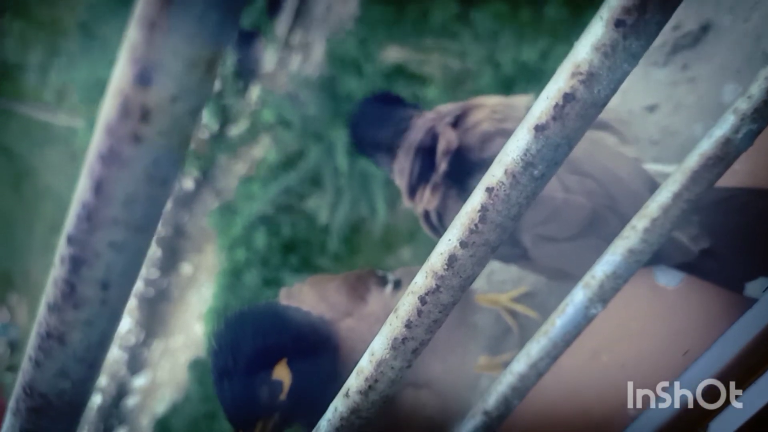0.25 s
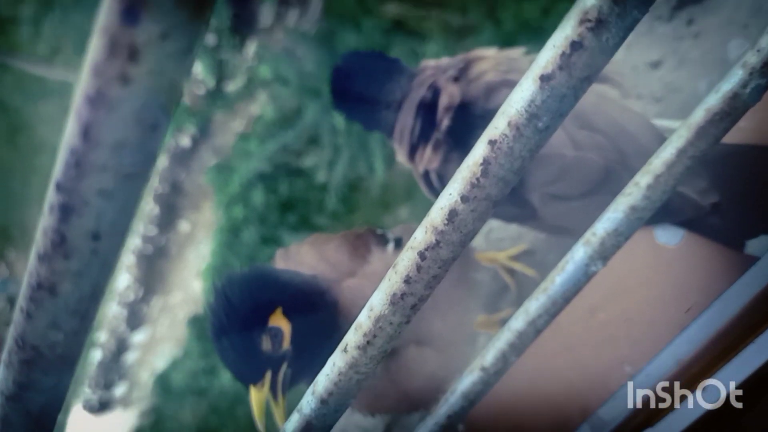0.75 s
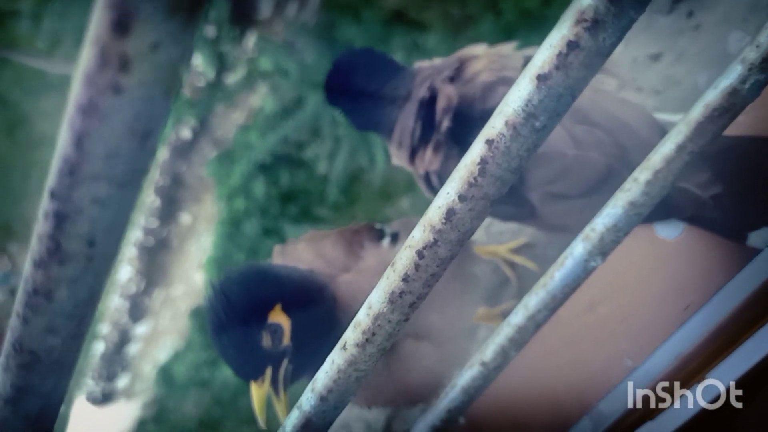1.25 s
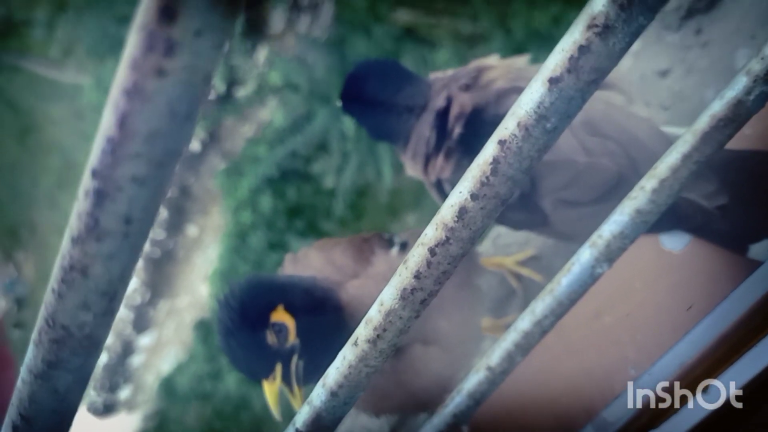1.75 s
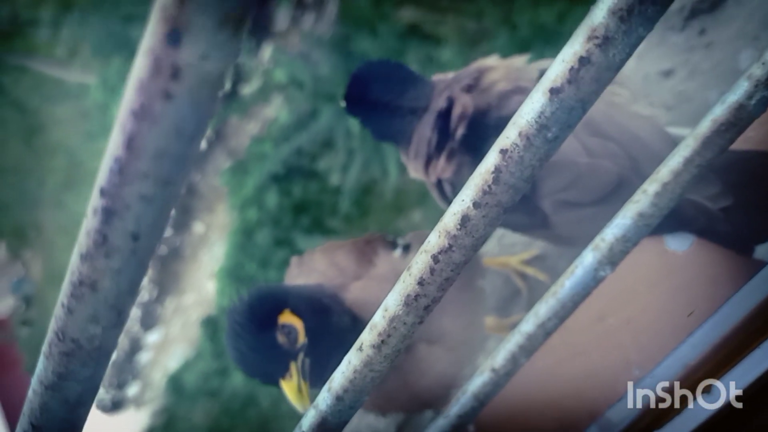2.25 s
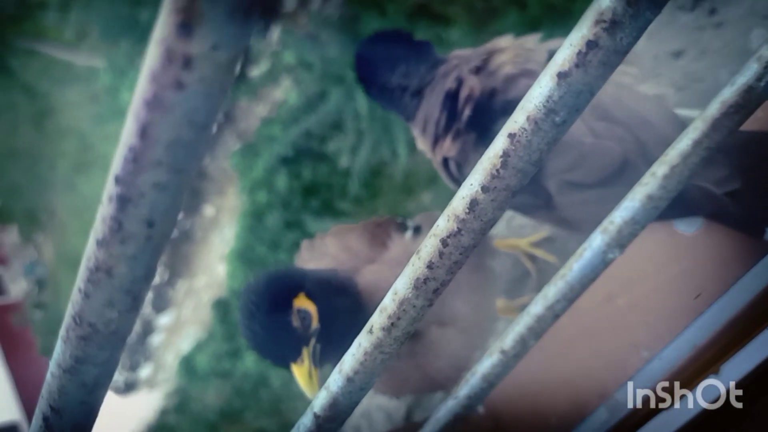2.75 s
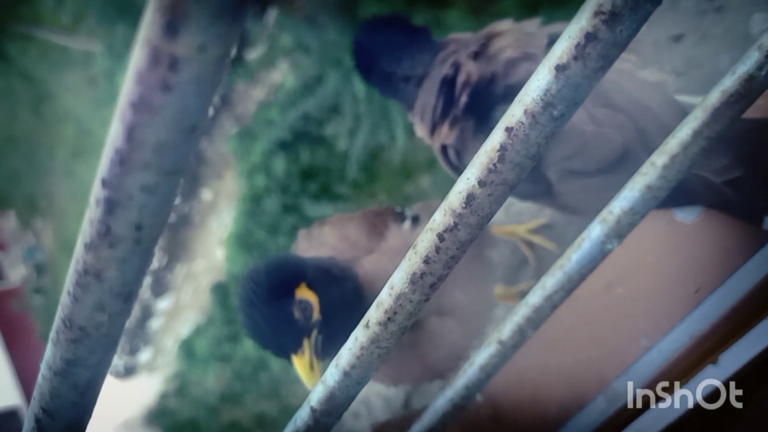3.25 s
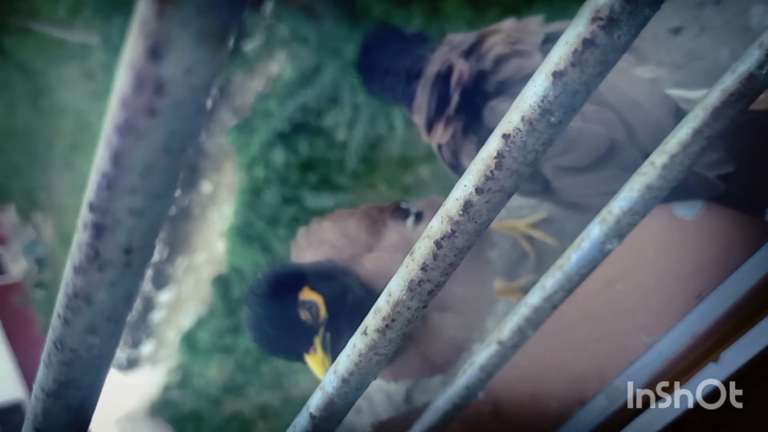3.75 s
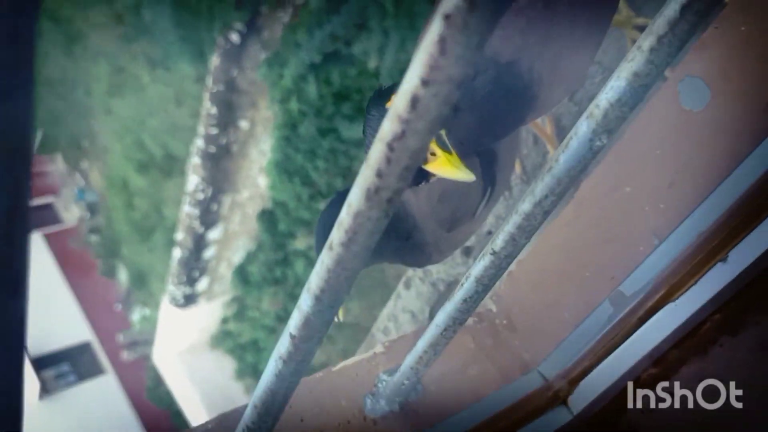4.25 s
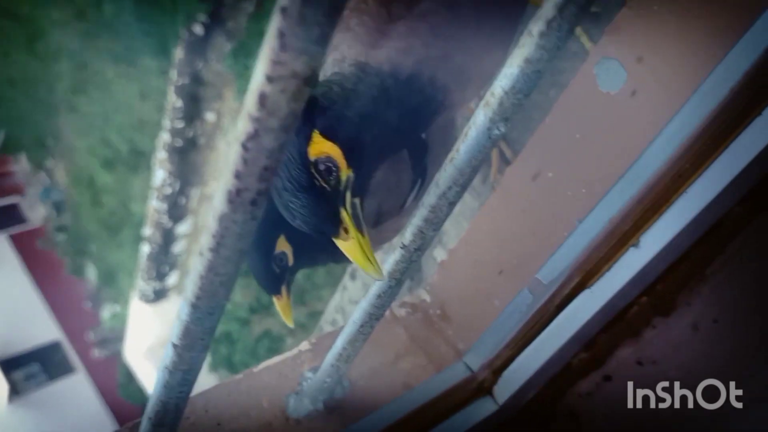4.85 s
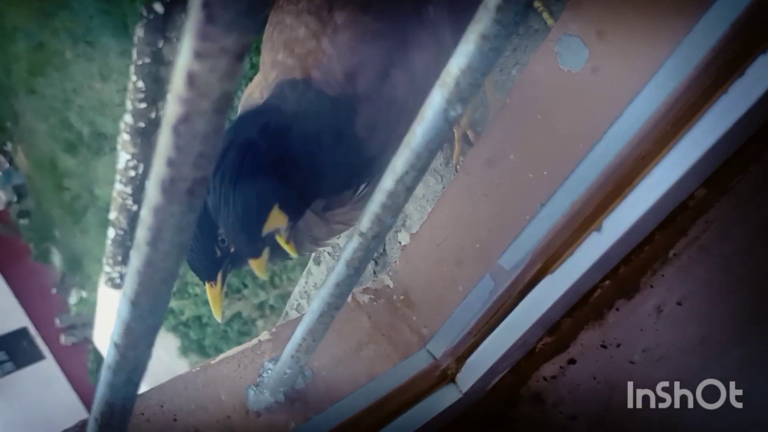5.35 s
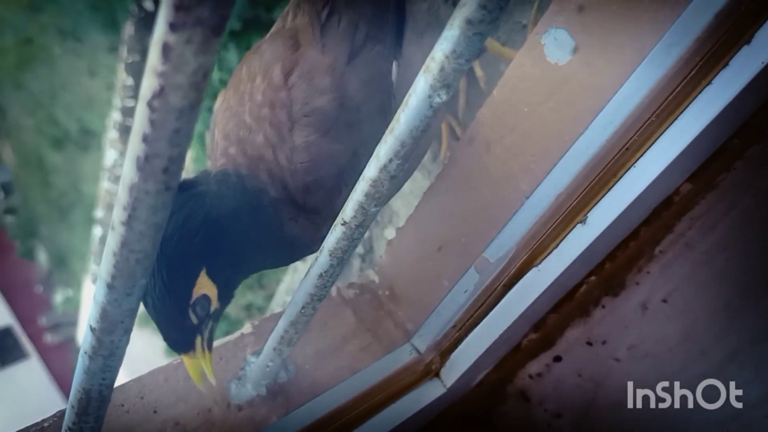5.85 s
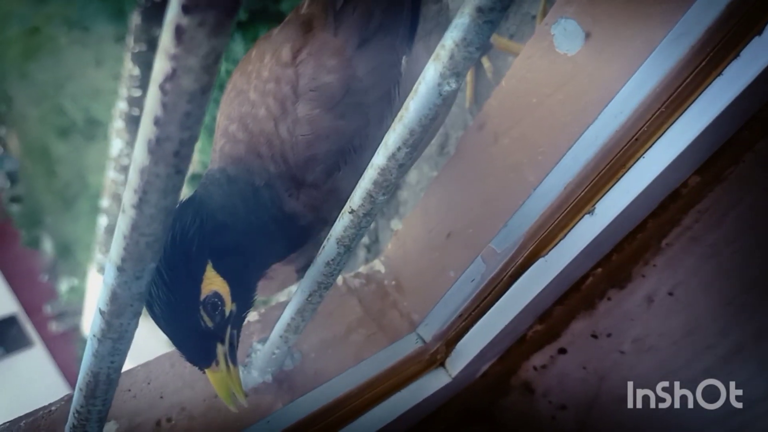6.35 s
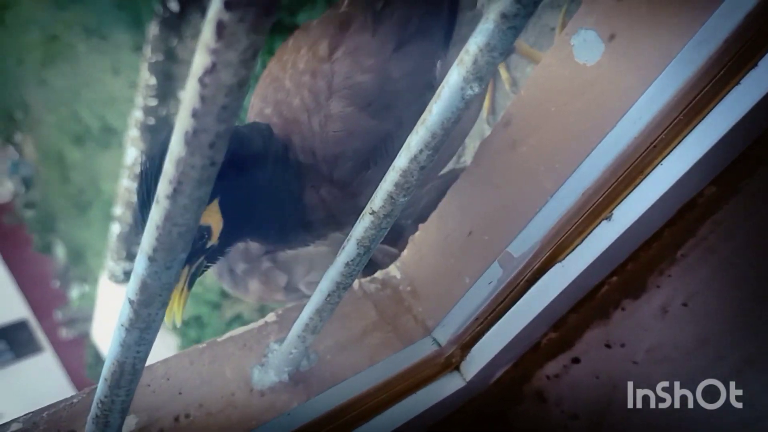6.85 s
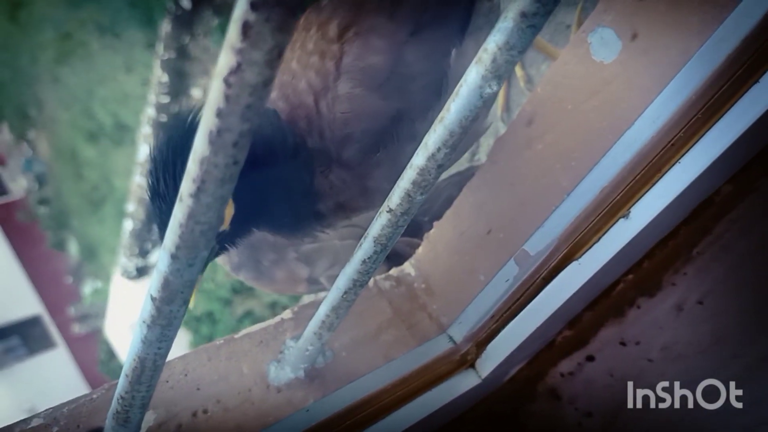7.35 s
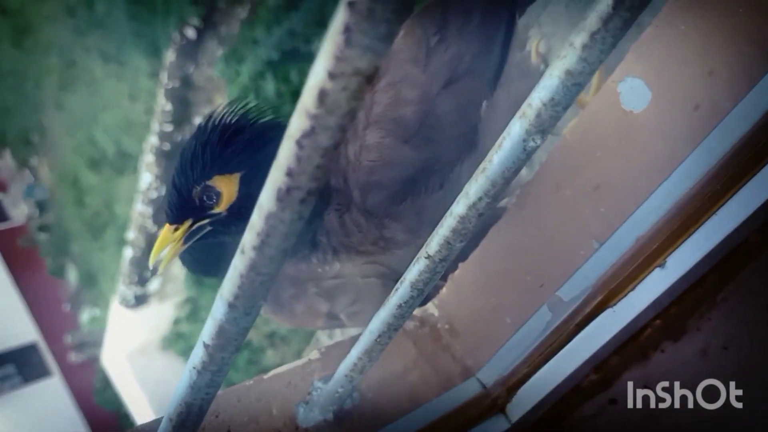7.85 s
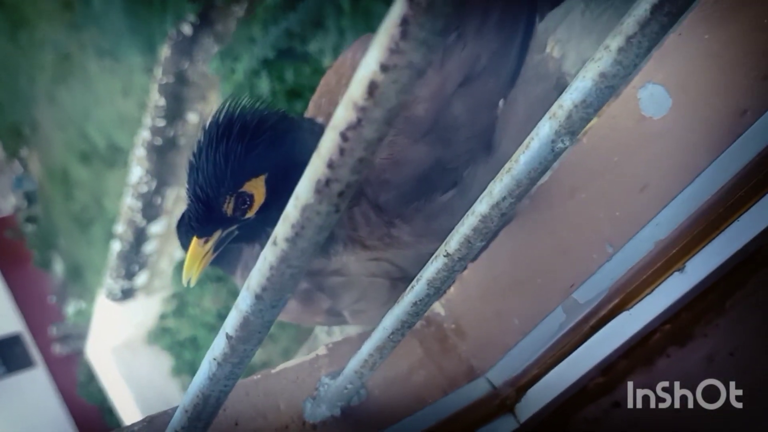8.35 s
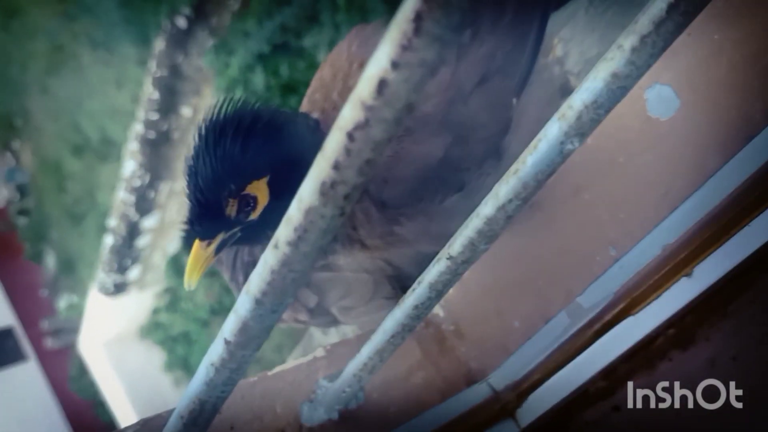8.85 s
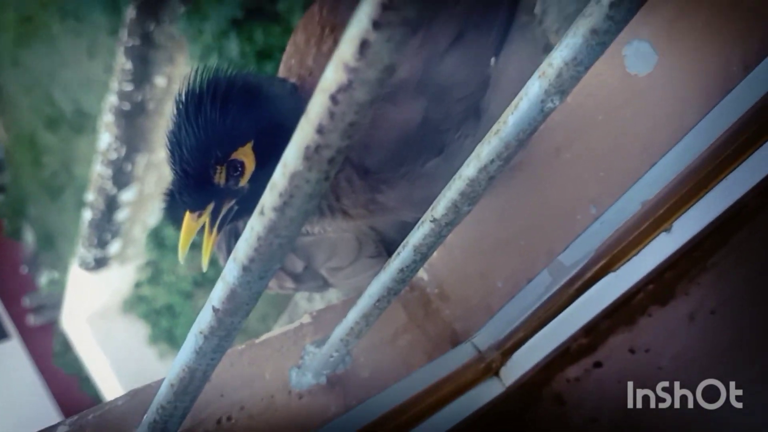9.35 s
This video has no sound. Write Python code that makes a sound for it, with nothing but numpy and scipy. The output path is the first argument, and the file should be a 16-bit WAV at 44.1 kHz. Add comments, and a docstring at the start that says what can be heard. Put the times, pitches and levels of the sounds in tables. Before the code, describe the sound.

A varied myna chatter at very close range: hoarse rasps, sharp slurred whistles, quick trills and bill clacks, with a far cock crowing faintly.

```python
"""Mynas on a window ledge rasp, whistle, pipe, chip and snap their bills close to a hand-held phone.
Behind them come a far cock, insects, village air and wind; walls return short echoes.
Calls are sums of gliding partials, smeared by irregular vibration and shaped by throat resonances.
Snaps, thumps and breath are decaying or filtered noise; air and wind are random short-time spectra."""
import sys
import numpy as np
from scipy import signal
from scipy.fft import rfft, irfft
from scipy.io import wavfile
from scipy.ndimage import uniform_filter1d

SR = 44100
rng = np.random.default_rng(int(sys.argv[2]) if len(sys.argv) > 2 else 0)


def master(y):
    """Save y as 16-bit WAV."""
    cut = np.clip(np.atleast_2d(y).T, -1, 1)
    pcm = np.round(cut * 32767)  # scale
    wavfile.write(sys.argv[1], SR, pcm.astype(np.int16))


N = 424241  # samples in the scene


def amp(db):
    """Decibel law: amplitude ratio of a level in dB."""
    return 10 ** (np.asarray(db) / 20)


def evened(x):
    """Normalisation to unit root-mean-square."""
    return x / np.sqrt(np.mean(abs(x) ** 2) + 1e-20)


def read(points, hz):
    """Interpolation of a spectrum along a logarithmic frequency axis."""
    f, value = np.transpose(points)
    return np.interp(np.log(hz + 1), np.log(f + 1), value)


def add(mix, s, sound):
    """Superposition: a sound joins the mix at s seconds, cut at the scene's ends."""
    at = round(s * SR)
    part, sound = mix[max(at, 0):], sound[max(-at, 0):]
    part[:len(sound)] += sound[:len(part)]


def curves(rows):
    """Linear interpolation of each column over the times in the first one."""
    s, *columns = np.transpose(rows)
    t = np.arange(s[0], s[-1], 1 / SR)
    return [np.interp(t, s, c) for c in columns]


def phrased(length, hz, db, phrase):
    """Similarity: one phrase is stretched to a call's length, pitch and level."""
    return np.array(phrase) * [length, hz, 1, 1] + [0, 0, db, 0]


def coloured(x, spectrum):
    """Linear filtering: a spectrum in dB shapes a sound, which is then evened."""
    gain = amp(read(spectrum, np.fft.rfftfreq(len(x), 1 / SR)))
    return evened(irfft(rfft(x) * gain, len(x)))


def wobble(count, hz):
    """Narrow-band random process: complex chance that changes about hz times a second."""
    z = rng.standard_normal((count, 2)) @ [1, 1j]
    settled = signal.lfilter(*signal.butter(2, hz / 2, fs=SR), np.tile(z, 2))[count:]
    return evened(settled)


def syrinx(hz, rough, partial_db, count, blur_hz=318.4, spread=0.73):
    """Harmonic series of vibrating membranes; irregularity smears lines into bands, high ones most."""
    turns, rough = np.cumsum(hz) / SR, np.clip(rough, 0, 1)
    tone = np.zeros(len(hz))
    for k in range(1, count + 1):
        steady = np.sqrt(1 - rough ** 2) + rough * wobble(len(hz), blur_hz * k ** spread)
        partial = (steady * np.exp(2j * np.pi * k * turns)).real
        tone += amp(partial_db(k)) * (k * hz < 9000) * partial
    ends = np.minimum(1, np.minimum(turns, turns[-1] - turns) / 4)  # four vibrations in and out
    return np.sqrt(2) * tone * ends


# Spectrum of air and wind. Each row: frequency in Hz, relative level in dB per Hz.
AIR = [(40, -28), (90, 1), (130, -3.5), (220, -0.5), (450, -11), (1300, -15.5), (2500, -13), (3800, -26.5),
       (4600, -25), (5600, -27), (6900, -21), (7500, -45.5)]
# Course of wind and air. Each row: time in seconds, wind below 450 Hz and air above it in dB before trim.
BACKGROUND = [(0.0, -74.5, -52.5), (0.96, -68.5, -45), (1.18, -67.5, -48.5), (1.689, -65, -44.5),
              (2.41, -72, -53.5), (3.43, -68, -41), (5.139, -71, -55.5), (5.38, -70.5, -56.5),
              (5.68, -62, -52), (6.099, -66, -49), (6.3, -52.5, -47.5), (6.649, -62, -52.5),
              (7.1, -68, -57), (7.5, -74.5, -60), (8.25, -71, -51), (8.57, -67.5, -46),
              (9.11, -74.5, -47.5), (9.62, -69, -53)]
# Coherence of the air at the two ports. Each row: frequency in Hz, left-right likeness (-1 to 1).
LIKENESS = [(60, 0.57), (200, 0.94), (660, 0.55), (2210, -0.022), (7360, 1)]
# Balance of the two ports, used for near sources too. Each row: frequency in Hz, left minus right in dB.
TILT = [(60, 5), (130, -1), (300, 0), (660, 1), (1480, 0), (3300, -2), (7360, -3)]
BASS_LEAD = 0.71  # radians the left port leads for air, wind and thumps


def background():
    """Partly coherent noise: random spectra with drifting patches; wind and air follow own levels."""
    frames, hz = N // 256 + 5, np.fft.rfftfreq(1024, 1 / SR)
    a, b, c, d, patches = rng.standard_normal((frames, 513, 5)).T
    patches = evened(uniform_filter1d(uniform_filter1d(patches, 10, 0), 10, 1))
    patch_db = np.where(hz < 450, 2.2, 4.8)[:, None] * patches
    same = np.clip(read(LIKENESS, hz), -1, 1)[:, None]
    left = a + 1j * b
    right = same * left + np.sqrt(1 - same ** 2) * (c + 1j * d)
    z = np.array([left, right]) * amp(read(AIR, hz)[:, None] + patch_db)
    z *= amp(np.outer([.5, -.5], read(TILT, hz)))[:, :, None]
    z[1] *= np.exp(-1j * BASS_LEAD)
    s, wind_db, air_db = np.transpose(BACKGROUND)
    low, t = (hz < 450)[:, None], np.arange(N) / SR
    out = np.zeros((2, N))
    for part, db in ((low, wind_db + 3.5), (~low, air_db - 8.5)):
        noise = signal.istft(z * part, nperseg=1024, noverlap=768)[1][:, :N]
        out += amp(np.interp(t, s, db)) * evened(noise)
    return out


INSECTS_DB, INSECTS_PER_S = -66, 320  # overall level; mean chirrs a second at each port


def insects():
    """Poisson superposition of many far, short falling chirrs, scattered over both ports."""
    out, u = np.zeros((2, N)), np.linspace(0, 1, 2200)
    for hz in np.linspace(5500., 6500., num=8):
        falling = np.sin(2 * np.pi * np.cumsum(hz * (1 - .09 * u)) / SR)
        chirr = falling * np.sin(np.pi * u) * wobble(len(u), 200).real
        starts = (rng.random((2, N)) < INSECTS_PER_S / 8 / SR) * rng.standard_normal((2, N))
        out += signal.oaconvolve(starts, chirr[None], axes=1)[:, :N]
    return amp(INSECTS_DB) * evened(out)


def walls(x, t60=0.21547, near_db=3.0, far_db=-10.5):
    """Exponential reverberation: dense echoes from ledge and glass, a weaker tail from the yard."""
    t = np.arange(40, SR // 2, 20) / SR
    taps = np.zeros((2, SR // 2 + 20))
    near, far = amp(near_db - 60 * t / 0.045698) / 4, amp(far_db - 60 * t / t60) / 6
    at = (t * SR).astype(int) + rng.integers(0, 20, (2, len(t)))  # other taps for each port
    np.put_along_axis(taps, at, rng.choice([-1., 1.], at.shape) * (near + far), 1)
    return signal.oaconvolve(x[None], taps, axes=1)[:, :N]


PHASE_STEP_S = 3.94  # the phase between the ports steps from the first list to the second here
# Two lists of port phases. Each row: frequency in Hz, radians by which the left port leads.
LEAD = [
    [(0, -7.5), (1120, 0.5), (2070, -6), (2410, -1.3354), (3450, -3.5), (4050, -1.5), (5340, 8.5),
     (7490, 14.5)],
    [(0, -14.5), (1120, 1.652), (1890, -2), (2410, 0), (2670, 3.5), (5340, 8), (6120, 11.5), (7490, 16.5)],
]
# The birds move about. Each row: time in seconds, left minus right in dB.
PAN = [(0.0, 1.5), (1.07, 1.5), (1.63, -2), (2.89, -0.5), (3.05, -0.5), (3.32, 0), (3.43, -1), (5.73, 4),
       (5.81, -2), (7.69, 1.5), (8.14, -0.5), (8.68, -2.5), (9.62, -1.5)]


def ports(x):
    """Interaural-style differences: each microphone port hears a near source in its own phase and level."""
    hz, t = np.fft.rfftfreq(N, 1 / SR), np.arange(N) / SR
    right = np.zeros(N)
    for part, lead in zip((t < PHASE_STEP_S, t >= PHASE_STEP_S), LEAD):
        lag = np.exp(-1j * read(lead, hz))
        right += irfft(rfft(x * part) * lag * amp(-read(TILT, hz)), N)
    pan_db = np.interp(t, *np.transpose(PAN)) / 2
    return np.array([x * amp(pan_db), right * amp(-pan_db)])


# Far crows, one list each. Each row: time in seconds, pitch in Hz, level in dB before the partials' offsets.
COCK = [
    [(3.945, 675.1, -59.5), (4.103, 665.5, -67), (4.285, 606.8, -66), (4.4, 553, -78.5)],
    [(5.7, 525.7, -75.5), (6.07, 661.1, -61), (6.142, 689.7, -60), (6.452, 591.2, -67), (6.502, 625.2, -78),
     (6.6, 591.5, -75)],
]


def cock(rows):
    """Harmonic series of four smeared partials: thin far crowing, the second partial strongest."""
    hz, db = curves(rows)

    def partial_db(k):
        return db + (-4, 4.5, -14.5, -3.5)[k - 1]
    return syrinx(hz, 0.51, partial_db, count=4, blur_hz=40.)


# Low dull thumps, some perhaps wind on the microphones. Each row: start in seconds, relative level in dB,
# pitch in Hz, t60 in seconds.
THUMPS = [(1.621, -45, 105.2, 0.27), (8.579, -26.5, 255.5, 0.3377), (9.344, -43, 97.39, 0.986),
          (9.396, -45, 80.99, 0.387)]


def thump(db, hz, t60):
    """Modal decay: a dull thump of two low modes, a rumble and a tick."""
    t = np.arange(int(.3 * SR)) / SR
    modes = np.sin(2 * np.pi * hz * t) + 0.53 * np.sin(2 * np.pi * 0.34 * hz * t)
    rumble = 0.8 * wobble(len(t), 500.).real
    tick = 0.23 * rng.standard_normal(len(t)) * amp(-60 * t / 0.014)
    return amp(db) * ((modes + rumble) * amp(-60 * t / t60) + tick)


def thump_ports(thumps):
    """Phase shift of the analytic signal: thumps are stronger and ahead in phase at the left port."""
    right = (signal.hilbert(thumps) * np.exp(-1j * BASS_LEAD)).real
    return np.array([amp(4.5) * thumps, amp(-4.0) * right])


# Volleys of a bird farther off. Each row: start in seconds, count, gap in seconds,
# relative level of the first pip in dB, growth in dB per pip.
CHATTER = [(4.001, 3, 0.0344, -41.5, -2), (7.0239, 4, 0.03142, -42.5, 1.37), (7.688, 2, 0.02056, -38.5, -1),
           (7.733, 2, 0.01985, -34, -4), (7.775, 2, 0.018, -34.5, -0.5), (7.8389, 1, 0, -36.5, -4)]
# Resonances of a chatter pip. Each row: frequency in Hz, relative level in dB.
CHATTER_MODES = [(2000, -26), (2420, 3), (3000, 8)]
CHATTER_TICK_DB = -8


def chatter(db):
    """Resonance of noise: a short hoarse pip in the throat modes, with a faint tick."""
    t = np.arange(900) / SR
    tick = amp(CHATTER_TICK_DB - 60 * t / 0.0065) * rng.standard_normal(len(t))
    pulse = np.zeros(len(t))
    for hz, mode_db in CHATTER_MODES:
        pulse += amp(mode_db) * (wobble(len(t), 660.0) * np.exp(2j * np.pi * hz * t)).real
    return amp(db - 11.0 - 60 * t / 0.025244) * (pulse + tick)


# Short single-partial pips, some alone, some colouring a whistle or squawk. Each row: start in seconds,
# length in seconds, first pitch in Hz, last pitch in Hz, level in dB, roughness (0-1).
PIPS = [(1.406, 0.03366, 2672, 1989, -42, 0.7), (1.524, 0.02006, 2732, 2187, -40.5, 0.5),
        (1.601, 0.02188, 2775, 2092, -35.5, 0.8), (1.658, 0.01618, 2648, 2248, -33, .6),
        (1.689, 0.03511, 3081, 2265, -36, .5), (4.148, 0.02, 2147, 1993, -51, 0.2),
        (4.206, 0.02268, 2440, 2384, -41, .6), (4.261, 0.01776, 2466, 1846, -41.5, 0.4),
        (4.347, 0.01362, 2338, 2461, -53.5, .6), (4.359, 0.024225, 2187, 2022, -51.5, .4),
        (4.388, 0.02803, 3560, 3708, -50, .6), (5.271, 0.1147, 4525, 4964, -38, 0.2),
        (5.748, 0.08643, 2226, 2358, -54, 0.3), (5.867, 0.03142, 5501, 4222, -49.5, 0.9),
        (6.192, .03, 3313, 3353, -40.5, 0.2), (6.198, 0.04257, 6625, 6708, -35.5, 0.41),
        (8.053, 0.026136, 2732, 2023, -46, 0.65), (9.239, 0.03194, 2464, 2309, -31.5, 0.7),
        (9.299, 0.03001, 2418, 2320, -28.5, 0.8)]


def pip(length, first_hz, last_hz, db, rough):
    """Frequency modulation: a single partial slides quickly to its last pitch."""
    u = np.arange(0, 1, 1 / (length * SR))
    hz = last_hz + (first_hz - last_hz) * (1 - u) ** 1.5
    return syrinx(hz, rough, lambda k: db, count=1, blur_hz=298.8) * np.sin(np.pi * u) ** 0.51


# Low hoarse growls. Each row: start in seconds, relative level in dB, length in seconds, top pitch in Hz,
# lateness of the swell (0-1).
GROWLS = [(0.11, -49.5, 0.2266, 588.3, 0.31), (0.339, -46.5, 0.1411, 572.2, 0.5),
          (0.557, -47.5, 0.1498, 556.3, 0.57), (0.794, -45, 0.14656, 571.9, 0.38),
          (1.051, -45, 0.12221, 583.4, 0.75), (3.49, -35.5, 0.18197, 521.3, 0.94),
          (3.701, -36, .18, 499.6, 0.8), (4.846, -36.5, 0.07958, 635.9, 0.24),
          (8.415, -36.5, 0.20083, 498.9, 0.99), (8.644, -37.5, 0.1884, 489.8, 0.89)]
# Throat with the bill open. Each row: frequency in Hz, relative level in dB.
GROWL_THROAT = [(150, -57), (280, -27.5), (420, -5), (700, -5), (1100, -4), (1550, 0), (1850, -13),
                (2500, -5.5), (3200, -21.5), (4200, -29.5), (8800, -89)]
GROWL_SHUT = .55  # ratio of the throat's resonances with the bill shut
GROWL_PUFFS = .55  # share of air, puffed at every second vibration


def growl(db, length, hz, swell):
    """Period doubling: alternate vibrations differ and puff air; pitch, effort and bill opening arch."""
    u = np.arange(0, 1, 1 / (length * SR))
    arch = np.sin(np.pi * u ** swell)
    half_pitch = hz * (.55 + .45 * arch) / 2
    bill = GROWL_SHUT + (1 - GROWL_SHUT) * arch

    def partial_db(k):
        return read(GROWL_THROAT, k * half_pitch / bill)
    tone = evened(syrinx(half_pitch, 0.718, partial_db, count=13, blur_hz=70.447, spread=0.7))
    puffs = np.exp(-(np.cumsum(half_pitch) / SR % 1) / 0.47) * rng.standard_normal(len(u))
    opened = coloured(puffs, GROWL_THROAT)
    shut = coloured(puffs, [(f * GROWL_SHUT, v) for f, v in GROWL_THROAT])
    air = arch ** 2 * opened + (1 - arch ** 2) * shut
    return amp(db - 1.5) * (tone + GROWL_PUFFS * air) * arch ** 1.1789


# Volleys of bill snaps. Each row: start in seconds, count, gap in seconds, relative level of the first in dB,
# growth in dB per snap, treble trim in dB, bass trim in dB.
SNAPS = [(1.3301, 1, 0.008, -24.5, 0, -33.5, -29), (2.655, 3, 0.0358, -17.5, -0.0534, -3, -13),
         (2.756, 6, 0.014, -18.5, 0.4563, -2.5, -12), (3.0817, 4, 0.0271, -22.5, -0.1135, -6, -46.5),
         (3.6333, 3, 0.03, -30.5, 4, 0, -10.5), (3.8551, 2, 0.036, -26.5, 4, -5.5, -19.5),
         (4.8501, 1, 0, -31.5, 0, -32, -19.5), (5.1333, 1, 0.0045, -27.5, 0, -19, -42),
         (5.8127, 1, 0, -27.5, 0, -7, -32), (6.1414, 3, 0.03513, -15.5, 2, -7, -20),
         (6.59, 1, 0.0078, -28.5, 0, 21.5, -41.5), (6.7849, 3, .036, -16, 0.33, -3, -17.5),
         (8.199, 2, .026, -30, 5, -24, -15.5), (8.2516, 1, 0, -29, 0, 0, -2.5),
         (8.2994, 1, 0.0046, -30, 0, -4, -5), (8.4305, 1, 0, -35.5, 0, -45.5, -10.5),
         (8.4578, 2, .0237, -33.5, 6, -4, -18), (8.536, 1, 0.0053, -26, 0, -7, -22.5)]
# Spectrum of a snap before its trims. Each row: frequency in Hz, relative level in dB.
BILL = [(88, -46), (150, -26), (439, -4), (602, -14.5), (1520, -18.5), (1730, -17), (2370, -10),
        (2800, -10.5), (3090, -8), (4450, -20.5), (5800, -6), (7810, -25), (10200, -49), (17200, -120)]


def snap(db, treble_db, bass_db):
    """Impulsive radiation: a sharp crack of coloured noise, most of it dying within milliseconds."""
    t = np.arange(2048) / SR
    colour = [(f, v + (treble_db + 1.5) * (f > 4300) + (bass_db + 5.0) * (f < 1300)) for f, v in BILL]
    decay = amp(-60 * t / 0.015104) + amp(-14.0 - 60 * t / 0.069)
    crack = coloured(rng.standard_normal(len(t)), colour) * decay
    return amp(db - 5.5) * signal.lfilter(*signal.butter(2, 220., "high", fs=SR), crack)


# Rasp phrases. Each row: share of the length, pitch ratio, level in dB, roughness (1 is wholly irregular).
SWELL = [(0, .73, -15.5, 0.92), (.23, .79, -7.5, 1.09), (0.501, .88, -2.5, 0.95), (0.701, 0.9583, 0, 0.99),
         (0.86, 0.9809, 3.5, 0.9), (0.997, 0.69, -7, 1.1)]
DRONE = [(0, 1, -4, 0.36), (.26, 1, -0.5, 0.8516), (.6, 0.94, 2, 0.8167), (.93, 1, 1.5, 1),
         (1, 1.1, -9.5, 0.38)]
# Harsh drawn-out rasps. Each row: start in seconds, length in seconds, pitch in Hz, relative level in dB,
# phrase.
RASPED = [(-.355, 0.36425, 1538, -28.5, SWELL), (0.173, 0.37118, 1495, -24.5, SWELL),
          (0.708, 0.36582, 1457, -23, SWELL), (3.084, .855, 1217, -49.5, DRONE),
          (9.493, 0.30313, 1477, -24, SWELL)]
# Throat of a rasp. Each row: frequency in Hz, relative level in dB.
RASP_THROAT = [(290, -59), (600, -26), (963, -24), (1420, -22.5), (1790, -17.5), (2000, -11.5), (2250, -8),
               (2550, 0), (2900, -3), (3300, 2), (3620, -6), (3950, -7), (4500, -16.5), (5600, -9),
               (7810, -28.5), (10200, -73.5), (17200, -120)]
WARBLE_HZ, THROB_DB = 31.077, 106  # rate of the warble; throb in dB per unit of pitch swing
BRIGHT_HZ, BRIGHTENING = 3500, 0.45  # treble gains this many dB more per dB of effort


def rasp(rows, warble=0, spread=1.7, first_db=-17.5, throat=RASP_THROAT, air=1.1):
    """Source and filter: smeared partials and turbulent air pass the throat; effort brightens them."""
    hz, db, rough = curves(rows)
    swing = warble * np.sin(2 * np.pi * WARBLE_HZ * np.arange(len(hz)) / SR)
    hz, db = hz * (1 + swing), db + THROB_DB * swing  # the level throbs with the pitch

    def partial_db(k):
        return read(throat, k * hz)
    tone = evened(syrinx(hz, rough, partial_db, count=12, blur_hz=60., spread=spread))
    # an added lowest partial stays fairly clear
    tone = tone + syrinx(hz, .52, lambda k: first_db, count=1, blur_hz=130.)
    breath = coloured(rng.standard_normal(len(hz)), throat) * signal.windows.tukey(len(hz), .04)
    voice = tone + air * rough ** 2 * breath
    treble = signal.filtfilt(*signal.butter(2, BRIGHT_HZ, "high", fs=SR), voice)
    treble_change = amp(BRIGHTENING * (db - db.max())) - 1
    return amp(db) * (voice + treble_change * treble)


# Warbling squawks, one list each. Each row: time in seconds, pitch in Hz, relative level in dB.
SQUAWKS = [
    [(1.41, 825.1, -33.5), (1.46, 834.6, -34.5), (1.54, 902.4, -28.5), (1.575, 996.6, -26.5),
     (1.685, 1004, -26), (1.71, 887.5, -35)],
    [(8.815, 601.3, -59), (8.84, 616.7, -37.5), (8.9, 654.9, -37), (9.03, 717.5, -34), (9.15, 724.1, -33),
     (9.26, 731.5, -32.5), (9.385, 707.4, -38.5)],
    [(9.04, 777.8, -38), (9.15, 896.1, -30.5), (9.22, 952.8, -30.5), (9.33, 1034, -29.5),
     (9.36, 961.6, -32), (9.395, 855.5, -62.5)],
]
# Throat of a squawk. Each row: frequency in Hz, relative level in dB.
SQUAWK_THROAT = [(500, -43.5), (750, -39), (1000, -23), (1400, -13.5), (1750, -14.5), (2000, -5.5),
                 (2450, 1.5), (2800, 4.5), (3300, 1.5), (3700, -7), (4300, -21.5), (5000, -11), (6000, -14),
                 (7800, -23.5), (10200, -61.5)]
HALF_LINES, HALF_BELOW_HZ = .35, 900  # below this pitch every second vibration is weaker, by this depth


def squawk(rows):
    """Subharmonic modulation: a half-clear rasp that roughens and trembles more as it goes on."""
    hz = curves(rows)[0]
    roughening = [(*row, rough) for row, rough in zip(rows, np.linspace(.37, .5, len(rows)))]
    tone = rasp(roughening, warble=np.linspace(.003, .03, len(hz)), spread=1.3,
                first_db=np.where(hz < 780, -40, -19), throat=SQUAWK_THROAT, air=1.2)
    return tone * (1 + HALF_LINES * (hz < HALF_BELOW_HZ) * np.cos(np.pi * np.cumsum(hz) / SR))


# Phrases of the piped notes. Each row: share of the length, pitch ratio, level in dB,
# slope above the second partial in dB per octave.
ARCH = [(0, 0.45, -15.5, -9.5), (0.149, .74, -15, -5), (0.297, .93, -5.5, -7), (0.543, 1, -5, -10.5),
        (.78, .92, -6.5, -11.5), (1.002, 0.38, -26, -7.5)]
HICCUP = [(0, 0.4, -9.5, -15.5), (0.171, 1.3, -16, -11), (.28, 1.02, 0, -1), (0.541, 1, -4, -8),
          (.72, .95, 0.5, -2.5), (0.998, .54, -16.5, -9)]
YODEL = [(0, 1.07, -8, -10.5), (0.065, .74, -6, -9.5), (0.128, .66, -15, -10.5), (0.187, 1.01, -1.5, -13),
         (0.43, 1, -6.5, -10), (.52, .99, -13, -7), (0.691, .97, -13, -7), (0.721, .73, -6, -30),
         (.78, .66, -7, -35.5), (.9, .62, -19.5, -32.5), (0.997, 0.38, -36, -31)]
DROOP = [(0, .91, -20.5, -22), (0.199, 1, -8.5, -18), (0.5, .85, -4.5, -12.5), (1, 0.8, -20.5, -9)]
HELD = [(0, 1.06, 1, -3), (.1, 1, -4, -3), (.85, 1, -3.5, -3), (1, 1.04, -5, -4)]
HUM = [(0, 1.05, -0.5, -6), (0.038, 1, -6, -0.5), (.3, .99, -0.5, -4), (.75, .97, -7, 0),
       (.85, .97, -7.5, -3.5), (1, .96, -11.5, -1)]
DROOP_FIRST_DB = 8  # drooping notes keep a strong first partial
# Piped notes. Each row: start in seconds, length in seconds, pitch in Hz, level of the second partial in dB
# before the phrase, phrase, roughness (0-1).
PIPE_NOTES = [(1.323, 0.52147, 971.4, -39, HUM, 0.5), (2.956, 0.0966, 1440, -36, DROOP, 0),
              (3.309, 0.14189, 672.5, -29, ARCH, 0.13), (4.201, 0.090686, 1546, -35, HICCUP, 0),
              (4.419, 0.09297, 1514, -32.5, HICCUP, 0.2), (4.619, 0.08802, 1496, -28, HICCUP, 0.1),
              (5.125, 0.22832, 1357, -24.5, YODEL, 0.07), (5.459, 0.22, 1358, -23, YODEL, 0),
              (5.816, 0.02566, 1738, -34.5, HELD, 0), (7.875, 0.13916, 1411, -42.5, DROOP, 0.08),
              (8.248, 0.15076, 673.8, -32.5, ARCH, 0.17)]
# Throat of piped notes. Each row: frequency in Hz, relative level in dB.
THROAT = [(300, -2), (950, -14.5), (1400, -9), (1900, 0), (2900, 7.5), (4000, -3.5), (4800, -11),
          (6000, -1.5), (7500, -17)]
# The same, nearly shut for low notes. Each row: frequency in Hz, relative level in dB.
SHUT_THROAT = [(300, -3.5), (1300, 6.5), (2100, 8.5), (2700, -0.5), (4500, -6)]


def pipe(rows, rough, glide_rough=.011, first_db=0):
    """Source and filter: partials pass the throat; fast glides and pressed bright notes turn hoarse."""
    hz, db, slope_db = curves(rows)
    throat = SHUT_THROAT if hz.max() < 800 else THROAT
    glide_speed = abs(np.gradient(np.log(hz))) * SR
    rough = rough + glide_rough * glide_speed + .045 * np.maximum(slope_db, 0)
    hz = hz * (1 + .006 * wobble(len(hz), 60).real)  # the pitch wavers

    def partial_db(k):
        source_db = db + first_db * (k == 1) + slope_db * np.log2(max(k / 2, 1))
        return source_db + read(throat, k * hz) - read(throat, 2 * hz)
    return syrinx(hz, rough, partial_db, count=9)


# Short rising chips. Each row: start in seconds, relative level in dB, pitch reached in Hz,
# nominal length in seconds.
CHIPS = [(1.935, -23.5, 1997, 0.026), (1.985, -20, 2014, 0.024), (2.285, -19, 1869, 0.024),
         (2.33, -19.5, 1883, 0.036), (2.465, -19, 1890, 0.035), (2.514, -18.5, 1903, 0.031),
         (2.656, -24, 1788, 0.027), (2.707, -20.5, 1934, .03), (2.857, -25.5, 1928, 0.033),
         (2.91, -20.5, 1950, 0.027)]
CHIP_ROUGH = .25  # 0-1


def chip(db, hz, length):
    """Frequency modulation: a hoarse dip, then an upward flick, with a weak first partial."""
    rows = [(0, .84 * hz, db - 22, -3), (.3 * length, .69 * hz, db - 10, -3),
            (.5 * length, .87 * hz, db - 6, -6), (.72 * length, hz, db - 8, -7),
            (.9 * length, 1.03 * hz, db - 10, -12), (1.15 * length, 1.02 * hz, db - 20, -16)]
    flick = pipe(rows, rough=CHIP_ROUGH, glide_rough=.003, first_db=-21)
    puff = coloured(rng.standard_normal(len(flick)), THROAT) * np.hanning(len(flick))
    return signal.lfilter(*signal.butter(2, 1100., "high", fs=SR), flick + amp(db - 17) * puff)


# Ragged chirps before a whistle. Each row: start in seconds, length in seconds, pitch in Hz,
# relative level in dB.
LIFTS = [(1.795, 0.036, 2339, -24.5), (2.098, 0.04, 2381, -22.5)]
# Their phrase. Each row: share of the length, pitch ratio, level in dB, slope in dB per octave.
LIFT = [(0, .8, -8, -9.5), (.36, 1, -9.5, -5.5), (.42, .83, 3.5, -1.5), (.7, .75, -1, 5), (1, 0.52, -12, 3)]


def lift(length, hz, db):
    """High-pass filtering weakens the first partial of a clear rise that breaks into a hoarse fall."""
    chirp = pipe(phrased(length, hz, db, LIFT), 0.17, glide_rough=0.019)
    return signal.lfilter(*signal.butter(2, 2800., "high", fs=SR), chirp)


def whistle(rows):
    """Near-sinusoidal vibration: an almost pure glide with its octave."""
    hz, db, octave_db = curves(rows)
    return syrinx(hz, 0.11, lambda k: (db, octave_db)[k - 1], count=2, blur_hz=246.0)


# Trills. Each row: start in seconds, relative level in dB, pitch of the first note in Hz, step in Hz per note.
TRILLS = [(3.106, -12.5, 3066, -130), (8.073, -17, 2983, -100)]
# Level of each trill note in turn [dB].
TRILL_DB = (-6, -3, -1, -8)
TRILL_GAP_S = .0301


def trill_note(db, hz):
    """Stepped frequency: flicks up, holds, steps down about a third, holds and drops away."""
    return whistle([(0, .9 * hz, db - 18.5, db - 48), (.003, hz, db - 5.5, db - 38),
                    (.014, hz, db - 4, db - 38), (.018, .82 * hz, db - 12, db - 42),
                    (.025, .8 * hz, db - 19.5, db - 40.5), (.029, 0.579 * hz, db - 20.5, db - 40.5)])


# Gliding whistles. Each row: start in seconds, length in seconds, entry pitch in Hz, held pitch in Hz,
# last pitch in Hz, hold in seconds, settling time in seconds, relative peak level in dB, seconds to the peak.
WHISTLES = [(1.84, 0.15207, 6074, 3698, 1811, .031, 0.020089, -12.5, 0.033237),
            (2.143, 0.14412, 6071, 3724, 1770, 0.031, 0.021432, -10.5, 0.03338),
            (4.151, 0.043, 4344, 4143, 2913, 0.011, 0.008866, -37, 0.0527),
            (4.357, .046, 4279, 4300, 3050, 0.013, 0.00733, -41.5, 0.04342),
            (4.846, 0.14783, 634.8, 650.6, 491.7, .01, 0.03156, -40.5, 0.0081),
            (5.347, 0.14334, 5099, 3748, 1625, .03, 0.02621, -13.5, 0.03608),
            (5.846, 0.0603, 3229, 3352, 3167, 0.03624, 0.0216, -32.5, 0.01574),
            (5.869, 0.14572, 2538, 2488, 1705, .016, 0.016916, -29, 0.029),
            (6.226, 0.14883, 2530, 2482, 1656, 0.014, 0.034144, -29, 0.034726),
            (6.567, 0.01, 2076, 2505, 2360, 0.011, .01, -36.5, 0.0052),
            (6.592, 0.18808, 3797, 3698, 1660, 0.026784, 0.056507, -20, 0.0552),
            (7.781, 0.06465, 4368, 4584, 4301, 0.016696, 0.020724, -45, 0.01725),
            (7.813, 0.0669, 3398, 3162, 2980, 0.028, 0.0337, -39.5, 0.01262),
            (7.996, 0.08335, 2407, 5313, 3608, 0.024657, 0.018462, -34.5, 0.04895)]
# Octave partial of the whistles. Each row: pitch in Hz, level in dB relative to the first partial.
OCTAVE = [(550, -14), (1800, -45), (2500, -38), (3000, -24), (3400, -8), (3800, -7), (4300, -28)]
JUMP_S, JUMP_STEEPNESS = 0.0041, 6.6  # from the entry pitch to the held one
BEND_S = 0.0037  # softness of the bend from hold to slide
RISE_DB_PER_S, FADE_DB, FADE_BEND = 399, -32.5, 1.1036
ENTRY_DB_PER_OCTAVE = 21.5  # a high entry is accented, a low one soft
# whistles falling from above this pitch falter as they pass it
BREAK_HZ, BREAK_WIDTH_HZ, BREAK_DB = 3400, 170, -24


def glide(length, entry_hz, held_hz, last_hz, hold_s, settle_s, db, peak_s):
    """Exponential relaxation: pitch jumps in, holds, slides and settles; level climbs, then fades faster."""
    t = np.linspace(0, length, num=150)
    entering = 1 / (1 + (t / JUMP_S) ** JUMP_STEEPNESS)
    sliding_s = BEND_S * np.logaddexp(0, (t - hold_s) / BEND_S)
    hz = last_hz + (held_hz - last_hz) * np.exp(-sliding_s / settle_s) + (entry_hz - held_hz) * entering
    rise_db = RISE_DB_PER_S * np.minimum(t - peak_s, 0)
    fade_db = FADE_DB * (np.maximum(t - peak_s, 0) / (length - peak_s)) ** FADE_BEND
    accent_db = ENTRY_DB_PER_OCTAVE * np.log2(entry_hz / held_hz) * entering
    break_db = BREAK_DB * np.exp(-((hz - BREAK_HZ) / BREAK_WIDTH_HZ) ** 2) * (held_hz > BREAK_HZ)
    db = db + rise_db + fade_db + accent_db + break_db
    return whistle(np.transpose([t, hz, db, db + read(OCTAVE, hz)]))


def scene():
    """Superposition: birds reach the ports directly and by the walls, over thumps, air and insects."""
    birds, thumps = np.zeros((2, N))
    for rows in COCK:
        add(birds, rows[0][0], cock(rows))
    for rows in SQUAWKS:
        add(birds, rows[0][0], squawk(rows))
    for s, *row in RASPED:
        add(birds, s, rasp(phrased(*row)))
    for s, *row, rough in PIPE_NOTES:
        first_db = DROOP_FIRST_DB * (row[-1] == DROOP)
        add(birds, s, pipe(phrased(*row), rough, first_db=first_db))
    for voice, table in ((pip, PIPS), (growl, GROWLS), (chip, CHIPS), (lift, LIFTS), (glide, WHISTLES)):
        for s, *row in table:
            add(birds, s, voice(*row))
    for s, db, hz, step_hz in TRILLS:
        for k, note_db in enumerate(TRILL_DB):
            add(birds, s + k * TRILL_GAP_S, trill_note(db + note_db, hz + k * step_hz))
    for voice, table in ((chatter, CHATTER), (snap, SNAPS)):
        for s, count, gap_s, db, growth_db, *colour in table:
            for k in range(round(count)):
                add(birds, s + k * gap_s, voice(db + k * growth_db, *colour))
    for s, *row in THUMPS:
        add(thumps, s, thump(*row))
    return ports(birds) + walls(birds) + thump_ports(thumps) + background() + insects()


EDGE_HZ, HISS_CARRIER_HZ, TOP_HZ = 7960, 16000, 15500  # band edge, carrier and upper limit of the hiss


def low_pass(x, hz):
    """Linear-phase filtering: keeps what lies below hz."""
    taps = signal.firwin(301, hz, window=("kaiser", 8), fs=SR)
    return signal.oaconvolve(x, taps[None], "same")


def record(dry):
    """Soft saturation, loss of the lowest bass, a band edge, and very faint hiss above that follows the calls."""
    saturated = 1.4 * np.tanh(dry / 1.4)
    bass_cut = signal.butter(3, 65., "high", fs=SR, output="sos")
    band = low_pass(signal.sosfilt(bass_cut, saturated), EDGE_HZ)
    carrier = np.exp(2j * np.pi * HISS_CARRIER_HZ * np.arange(N) / SR)
    hiss = amp(-43) * band * (wobble(N, 900) * carrier).real
    return low_pass(band + hiss, TOP_HZ)


dry = scene()
out = record(dry)
master(out)
```